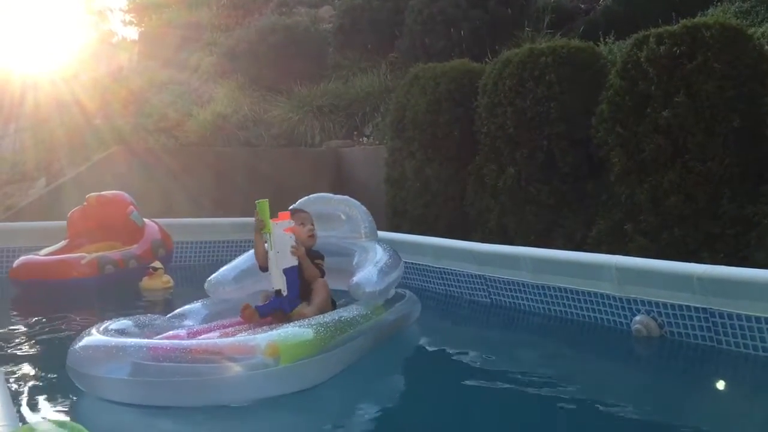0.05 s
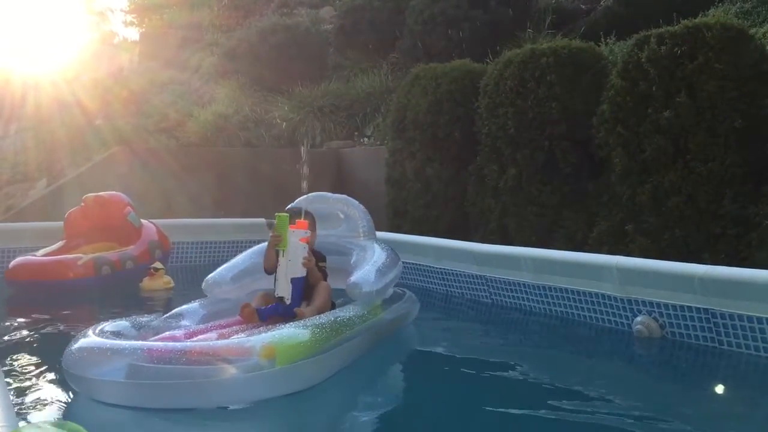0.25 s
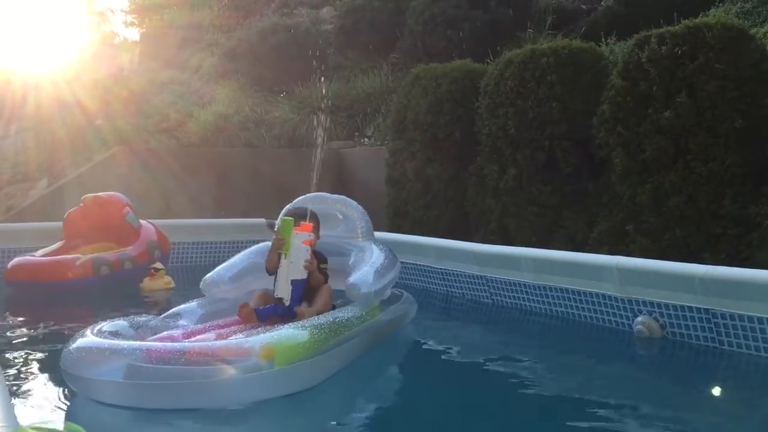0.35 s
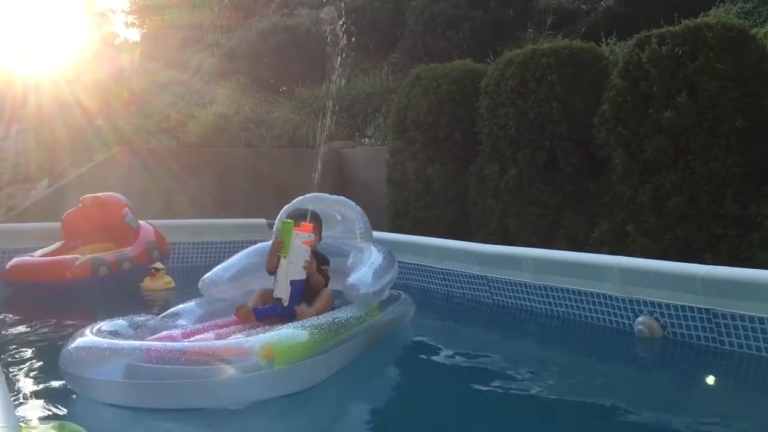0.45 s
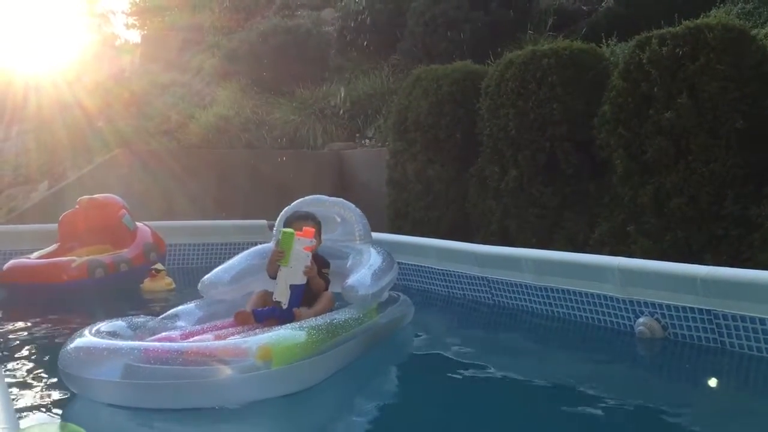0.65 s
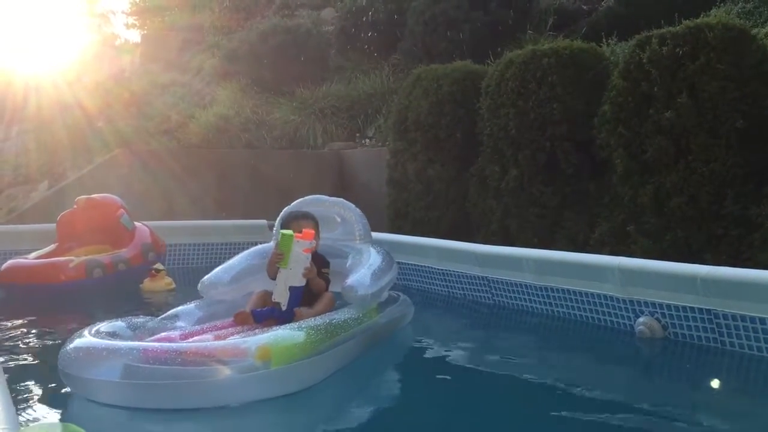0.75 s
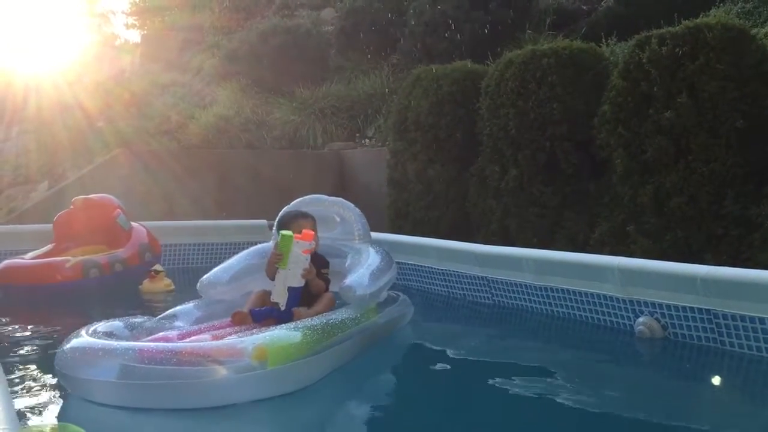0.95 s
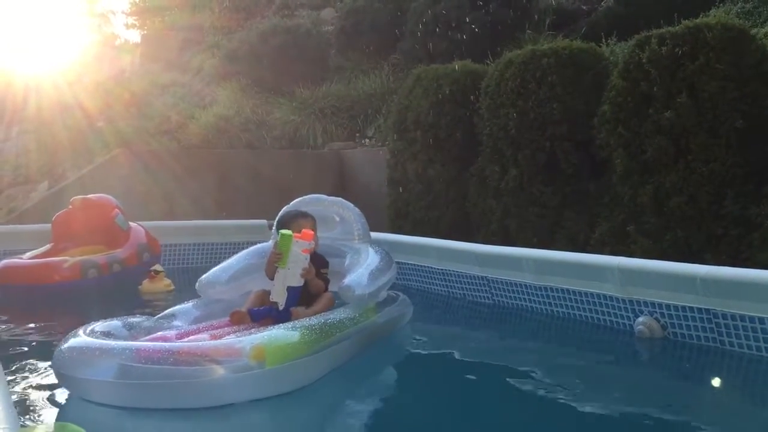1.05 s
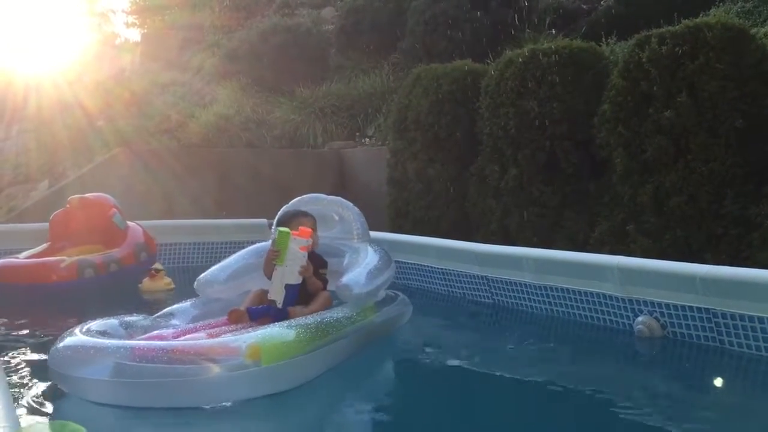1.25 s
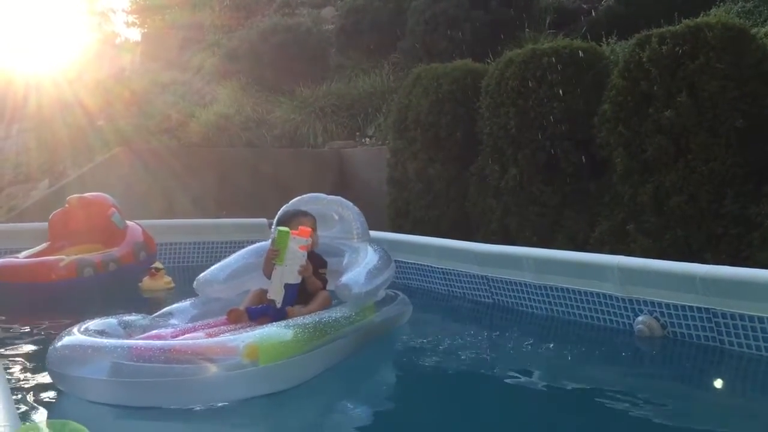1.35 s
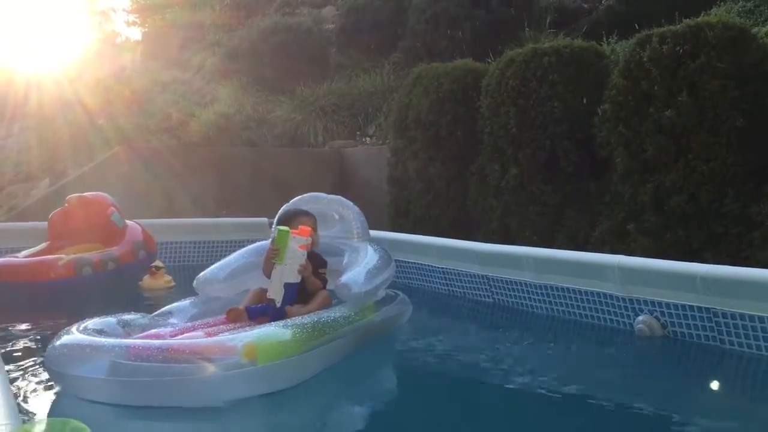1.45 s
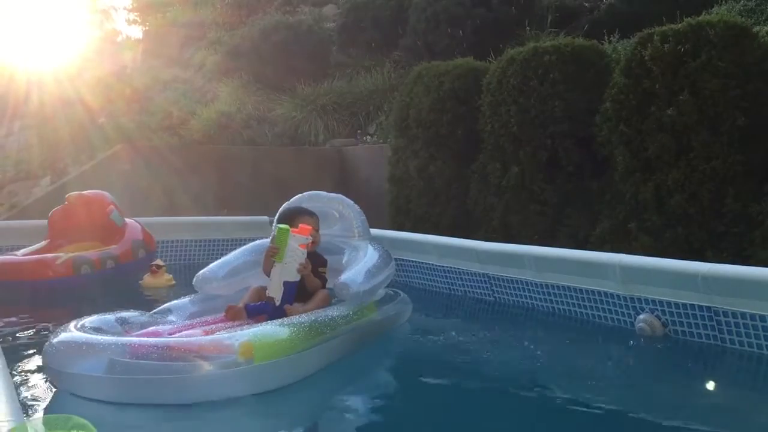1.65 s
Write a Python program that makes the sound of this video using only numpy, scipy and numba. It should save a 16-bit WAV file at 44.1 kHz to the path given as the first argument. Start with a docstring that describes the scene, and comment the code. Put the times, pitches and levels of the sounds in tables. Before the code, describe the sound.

A toy water gun squirts with a sputtering hiss, then water splashes into a pool.

```python
"""A low outdoor rumble and a faint hum run throughout. From about 0.2 s a toy water gun fires upward from a
float in a backyard pool: bubbles pop, the barrel gargles, the valve ticks, trapped air spits through the
nozzle and the jet hisses, until the hollow tank knocks at the end of the stroke. Pool walls and hedges
add a short echo. After a brief flight the slug of water slaps into the pool at 1.37 s and opens a booming
cavity; stray drops plink and patter after it until 1.7 s."""
import sys
import numpy as np
from scipy import signal
from scipy.fft import rfft, irfft, next_fast_len
from scipy.io import wavfile
from scipy.ndimage import uniform_filter1d
from numba import njit

SR = 44100
rng = np.random.default_rng(int(sys.argv[2]) if len(sys.argv) > 2 else 0)


def dump(signal):
    """Clip the signal to [-1, 1] and save it as 16-bit WAV at the path in sys.argv[1]."""
    limited = np.clip(np.atleast_2d(signal).T, -1, 1)
    pcm = np.round(limited * 32767).astype(np.int16)
    wavfile.write(sys.argv[1], SR, pcm)


N = 74970

# Spectrum of the outdoor rumble: f/Hz, level/dB (in every spectrum, levels are relative)
YARD_SPECTRUM = [(22, -33), (32, -24.5), (45, -6), (62, -0.5), (105, 0.5), (150, 0), (195, -8.5),
                 (260, -6.5), (320, -5.5), (420, -18), (600, -20), (1000, -21), (2000, -27), (4000, -35),
                 (8000, -39.5), (14500, -43.5)]
# Bubbles bursting at the nozzle: t/s, level/dB, f/Hz
POPS = [(0.167, -53, 1750), (0.2245, -44, 2790), (0.2655, -44.5, 1240), (.2695, -41.5, 2015),
        (0.3235, -37.5, 5670), (0.401, -42, 3950), (0.41, -59, 4000), (0.455, -45.5, 4350),
        (.531, -38, 2028), (.543, -54, 780), (.611, -51, 930), (.619, -53, 770)]
# Reflections from the water and the float: delay/s, level/dB
REFLECTIONS = [(.0046, -12), (0.0096, -13)]
# Spectrum of the echo: f/Hz, level/dB
ECHO_SPECTRUM = [(100, 8.5), (1000, -6.5), (3000, 7.5), (7000, 5), (14000, -1)]
# Envelope of the gargle in the barrel: t/s, level/dB
GARGLE_ENVELOPE = [(.2, -66.5), (.235, -50.5), (.252, -56), (.271, -52.5), (.283, -53.5), (.3, -42.5),
                   (.315, -58), (.355, -53.5), (.385, -49.5), (.425, -58), (.52, -57.5), (.55, -50),
                   (.613, -47.5), (.645, -53.5), (.675, -50.5), (.73, -73)]
# Spectrum of the gargle: f/Hz, level/dB
GARGLE_SPECTRUM = [(250, -29), (700, -7.5), (1000, -23), (1500, -2.5), (2200, -1), (3200, 0), (4800, -8),
                   (6300, -1.5), (9000, -15.5), (14000, -12)]
# Ticks of the valve: t/s, level/dB, decay/s
VALVE_TICKS = [(.2038, -41, 0.0027), (0.37, -35, 0.00073), (0.556, -46, 0.0011), (0.6267, -30, 0.0009),
               (0.653, -34, 0.000886)]
# Spectrum of the ticks: f/Hz, level/dB
VALVE_SPECTRUM = [(1000, -10), (2500, -16), (5000, -11), (8000, -8), (12000, -3), (14500, -2.5)]
# Air pockets in the nozzle: t/s, level/dB, attack/s, length/s, first f/Hz, last f/Hz, feedback/1
SPITS = [(0.2202, -36.5, 0.0017, 0.01, 3010, 2240, 0.64), (0.2895, -41, 0.001, .016, 4000, 4000, 0.6),
         (0.3186, -40, .0006, 0.01, 5750, 5620, 0.26), (0.335, -39, 0.0017, .012, 2800, 2270, .55),
         (0.347, -36, 0.0033, 0.018, 2300, 2190, 0.57), (0.5287, -32.5, 0.00068, 0.016, 2980, 1996, 0.57),
         (.5775, -29.5, 0.0011, 0.014, 3112, 3158, 0.75), (0.6544, -32.5, 0.0094, .016, 3320, 3030, 0.29)]
# Spectrum of the spits: f/Hz, level/dB
SPIT_SPECTRUM = [(300, -39), (1000, -36), (1500, -9), (2100, -0.5), (3200, -0.5), (4500, -4), (6300, -1),
                 (8000, -4.5), (11000, -7), (14500, -2.5)]
# Envelope of the rumble during the squeeze: t/s, level/dB
SLOSH_ENVELOPE = [(.25, -59), (.33, -77), (.47, -53), (.6, -68), (.72, -76)]
# Spectrum of that rumble: f/Hz, level/dB
SLOSH_SPECTRUM = [(28, -27), (55, 3.5), (110, 1.5), (170, 2), (300, -14.5), (600, -30), (2000, -47)]
# Envelope of the jet's fine spray: t/s, level/dB
JET_ENVELOPE = [(.284, -80), (.291, -43.5), (.37, -43), (.42, -44.5), (.485, -47), (.515, -52), (.56, -41),
                (.588, -41), (.6, -64), (.622, -62), (.631, -42), (.668, -46), (.69, -64), (.73, -85)]
# Spectrum of the jet: f/Hz, level/dB
JET_SPECTRUM = [(500, -42), (1500, -20.5), (3000, -10.5), (4300, -3.5), (6200, -5.5), (8000, -2),
                (10500, -1.5), (12500, 2), (14500, 4)]
# Impacts of the landing water: t/s, level/dB, attack/s, decay/s
SLAPS = [(1.3737, -41.5, 0.0014, 0.0047), (1.3778, -39.5, 0.0021, 0.0064), (1.384, -47, 0.028, 0.05)]
# Spectrum of the impacts: f/Hz, level/dB
SLAP_SPECTRUM = [(100, 6), (300, 4.5), (550, 0.5), (900, -4), (1600, -3), (2300, -2.5), (3300, -11),
                 (4500, -18.5), (8000, -28.5), (14000, -26)]
# Drops that trap a bubble: t/s, level/dB, f/Hz
BUBBLE_DROPS = [(1.3865, -41.5, 1492), (1.4892, -48.5, 5670), (1.496, -52, 4360), (1.5445, -56, 5360),
                (1.567, -52.5, 4260), (1.6062, -52, 5230), (1.6198, -43.5, 3144), (1.634, -42.5, 1732),
                (1.6651, -41, 2587), (1.686, -52, 3210)]
# Drops that only tick on the surface: t/s, level/dB
SPLATS = [(1.394, -51), (1.4825, -53), (1.5196, -52.5), (1.526, -59), (1.681, -54), (1.6867, -58),
          (1.695, -66)]
# Spectrum of the drop impacts: f/Hz, level/dB
PATTER_SPECTRUM = [(1500, -12), (4000, -2), (8000, -0.5), (11000, -1.5), (14500, 0.5)]

BUBBLE_CYCLES, BUBBLE_RISE = 11.7, 0.019  # periods and fractional rise in frequency per decay time


def undb(db):
    """Amplitude ratio of a level: a factor of ten per 20 dB."""
    return 10 ** (np.asarray(db) / 20)


def clock():
    """Uniform sampling: the time of each sample in seconds."""
    return np.arange(N) / SR


def unit(x):
    """Normalisation to an rms value of 1."""
    return x / np.sqrt(np.mean(x ** 2))


def colour(x, spectrum):
    """Minimum-phase filtering through (f/Hz, level/dB) points; the power of white noise is conserved."""
    size = 2 * next_fast_len(N)
    hz, db = np.array(spectrum, float).T
    bin_hz = np.arange(size // 2 + 1) * SR / size
    gain = unit(undb(np.interp(np.log(bin_hz + 1), np.log(hz), db)))
    cepstrum = irfft(np.log(gain))
    cepstrum[1:size // 2] *= 2  # folding onto positive time makes the filter causal
    cepstrum[size // 2 + 1:] = 0
    return irfft(rfft(x, size) * np.exp(rfft(cepstrum)))[:N]


def walk(rate_hz):
    """Low-pass random fluctuation of rms 1, correlated over about 1 / rate_hz."""
    width = max(int(SR / rate_hz), 1)
    smoothed = uniform_filter1d(rng.standard_normal(N), width, mode="wrap")
    return unit(uniform_filter1d(smoothed, width, mode="wrap"))


def spray(rough_db, rate_hz):
    """Random amplitude modulation breaks noise into packets, as water tears into drops."""
    return unit(rng.standard_normal(N) * undb(rough_db * walk(rate_hz)))


def burst(start, attack, decay):
    """Envelope of a transient: linear growth, then exponential decay."""
    age = clock() - start
    return np.clip(age / attack, 0, 1) * np.exp(-np.maximum(age - attack, 0) / decay)


def curve(envelope):
    """Amplitude by interpolation of (t/s, level/dB) points, zero outside them."""
    t = clock()
    times, db = np.array(envelope).T
    return undb(np.interp(t, times, db)) * (t > times[0]) * (t < times[-1])


def ring(start, hz, attack, decay, rise=0):
    """Damped oscillator; its frequency gains the fraction `rise` in each of its first ten decay times."""
    age = np.maximum(clock() - start, 0)
    pitch = hz * (1 + rise * np.minimum(age / decay, 10))
    return np.sin(2 * np.pi * np.cumsum(pitch * (age > 0)) / SR) * burst(start, attack, decay)


def yard(rumble_db=-56.5, hum_db=-67, hum_hz=146):
    """Ambient noise: distant rumble and a faint hum, slowly modulated in amplitude and frequency."""
    rumble = colour(rng.standard_normal(N), YARD_SPECTRUM) * undb(rumble_db - walk(6.4))
    phase = 2 * np.pi * np.cumsum(hum_hz * (1 + 0.01744 * walk(11.4))) / SR
    hum = np.sqrt(2) * np.sin(phase) * undb(hum_db + 2 * walk(9.9))
    return rumble + hum


def nozzle_pops():
    """Each bubble bursting at the nozzle excites a brief damped oscillation of rising pitch."""
    rings = sum(undb(db) * ring(start, hz, attack=0.0017, decay=0.0045, rise=0.0266)
                for start, db, hz in POPS)
    return rings * undb(-0.5 + 3.7 * walk(500))


def early_reflections(x):
    """Image sources: the water and the float each return a delayed, weaker copy of the sound."""
    t = clock()
    return sum(undb(db) * np.interp(t - delay, t, x, left=0) for delay, db in REFLECTIONS)


def echo(x, level_db=-15, t60_s=0.18):
    """Scattering from pool walls and hedges: convolution with exponentially decaying noise."""
    tail = rng.standard_normal(N) * burst(start=0.0047, attack=0.0055, decay=t60_s / np.log(1000))
    response = colour(tail / np.linalg.norm(tail), ECHO_SPECTRUM)
    return undb(level_db) * signal.fftconvolve(x, response)[:N]


def gargle():
    """Two-phase flow: water and air mixing in the barrel radiate uneven noise."""
    return colour(spray(rough_db=2.5, rate_hz=220) * curve(GARGLE_ENVELOPE), GARGLE_SPECTRUM)


def churn(low_hz=614, high_hz=2400):
    """Bubbles of many sizes resonate in the barrel, in proportion to the amplitude of the gargle."""
    out, effort = np.zeros(N), curve(GARGLE_ENVELOPE)
    first, last = GARGLE_ENVELOPE[0][0], GARGLE_ENVELOPE[-1][0]
    for when, smallness, strength in rng.uniform(size=(70, 3)):
        start = first + when * (last - first)
        hz = low_hz * (high_hz / low_hz) ** smallness
        gain = effort[int(start * SR)] * undb(-20.5 + 10 * strength)
        out += gain * ring(start, hz, attack=0.0013, decay=BUBBLE_CYCLES / hz, rise=BUBBLE_RISE)
    return out


def valve_ticks():
    """Impulsive excitation: each tick of the valve is brief and therefore broadband."""
    envelope = sum(undb(db) * burst(start, 0.00018, decay) for start, db, decay in VALVE_TICKS)
    return colour(envelope * rng.standard_normal(N), VALVE_SPECTRUM)


@njit
def air_column(x, period_samples, feedback):
    """Delayed feedback: a column of changing length resonates at harmonics of its round-trip rate."""
    y = x.copy()
    for i in range(200, len(x)):
        place = i - period_samples[i]
        k = int(place)
        y[i] += feedback * (y[k] + (place - k) * (y[k + 1] - y[k]))
    return y


def spits(glide_s=0.0062, sag_s=0.017, release_s=0.0032, jitter_hz=180, whistle_db=-12):
    """Pipe resonance: an air pocket rings the nozzle, lower if it lengthens, until water closes it."""
    out = np.zeros(N)
    for start, db, attack, length, first_hz, last_hz, feedback in SPITS:
        age = np.maximum(clock() - start, 0)
        hz = last_hz + (first_hz - last_hz) * np.exp(-(age / glide_s) ** 2)
        air = unit(air_column(spray(rough_db=2, rate_hz=1800), SR / hz, feedback))
        phase = 2 * np.pi * np.cumsum(hz + jitter_hz * walk(800)) / SR
        whistle = undb(whistle_db) * feedback * np.sqrt(2) * np.sin(phase)
        closing = np.exp(-np.maximum(age - length, 0) / release_s)
        out += undb(db) * burst(start, attack, sag_s) * closing * (air + whistle)
    return colour(out, SPIT_SPECTRUM)


def slosh():
    """Amplitude-modulated low-frequency noise: a rumble swells while the gun is squeezed."""
    return colour(rng.standard_normal(N) * curve(SLOSH_ENVELOPE), SLOSH_SPECTRUM)


def jet():
    """Jet break-up: water tearing into fine spray radiates a high-frequency hiss."""
    return colour(spray(rough_db=3, rate_hz=480) * curve(JET_ENVELOPE), JET_SPECTRUM)


def tank_knock():
    """Free vibration: one damped mode of the hollow tank sounds as the stroke ends."""
    return undb(-44) * ring(start=0.663, hz=305, attack=0.0048, decay=0.009)


def slap():
    """Impact noise: the slug strikes the surface in two quick bursts and falls back as froth."""
    envelope = sum(undb(db) * burst(start, attack, decay) for start, db, attack, decay in SLAPS)
    return colour(envelope * spray(rough_db=2.5, rate_hz=600), SLAP_SPECTRUM)


def after_ring():
    """A thin high tone under random amplitude modulation swells and fades behind the splash."""
    return ring(start=1.385, hz=6480, attack=0.035, decay=0.03) * undb(-66 + 2.5 * walk(190))


def cavity_boom():
    """Cavity resonance: the air pocket under the splash gives a low, heavily damped oscillation."""
    return undb(-32.5) * ring(start=1.3862, hz=103, attack=0.007, decay=0.007, rise=0.014)


def drop_impacts(small_drops=45, splat_decay_s=0.0016):
    """Impact noise: every drop ticks on the surface, and the smallest patter at random times."""
    envelope = np.zeros(N)
    for start, db, _ in BUBBLE_DROPS:
        envelope += undb(db - 14) * burst(start, attack=0.00053, decay=0.0046)
    for start, db in SPLATS:
        envelope += undb(db) * burst(start, attack=0.0005, decay=splat_decay_s)
    noise = rng.standard_normal(N)
    for start in rng.uniform(1.465, 1.71, size=small_drops):
        db = -66 + 3 * min(rng.standard_normal(), 1)
        envelope += undb(db) * burst(start, attack=0.00045, decay=splat_decay_s)
    return colour(envelope * noise, PATTER_SPECTRUM)


def plip(start, hz, overshoot=0.45, decay_s=0.0014):
    """Pinch-off: as a bubble's neck closes, a short chirp falls onto its natural frequency."""
    age = np.maximum(clock() - start, 0)
    pitch = hz * (1 + overshoot * np.exp(-age / decay_s))
    return np.sin(2 * np.pi * np.cumsum(pitch) / SR) * burst(start, attack=0.00031, decay=decay_s)


def drop_bubbles(plip_db=-4):
    """Bubble resonance: air trapped by each big drop pinches off and rings with a rising pitch."""
    out = np.zeros(N)
    for start, db, hz in BUBBLE_DROPS:
        tone = ring(start, hz, attack=0.001, decay=BUBBLE_CYCLES / hz, rise=BUBBLE_RISE)
        out += undb(db) * (tone + undb(plip_db) * plip(start, hz))
    return out * undb(-2 + 2 * walk(1500))


def scene():
    """Linear superposition of squirt, splash, drops, their reflections and the low rumbles."""
    gun = jet() + gargle() + valve_ticks() + spits() + tank_knock() + nozzle_pops() + churn()
    landing = slap() + after_ring() + cavity_boom() + drop_impacts() + drop_bubbles()
    water = gun + early_reflections(gun) + landing
    return (water + echo(water) + yard() + slosh())[None]


def record(dry, cutoff_hz=15500):
    """Band limiting: a steep elliptic low-pass filter removes the highest treble."""
    return signal.sosfilt(signal.ellip(10, 0.2, 70, cutoff_hz, fs=SR, output="sos"), dry)


dry = scene()
out = record(dry)
dump(out)
```